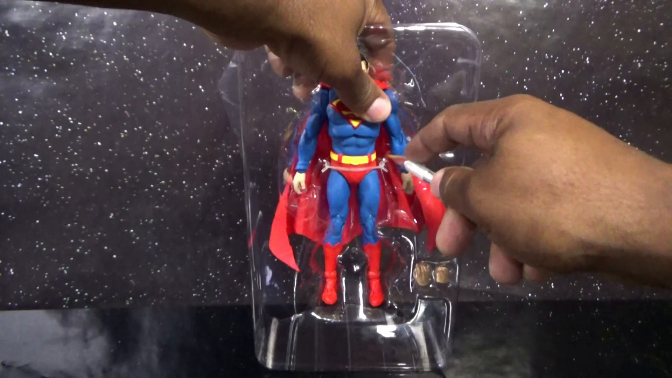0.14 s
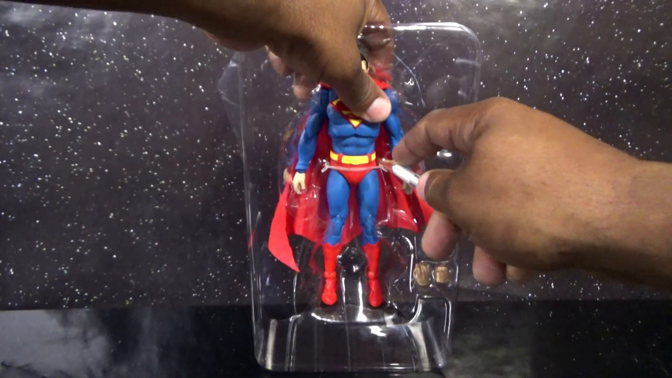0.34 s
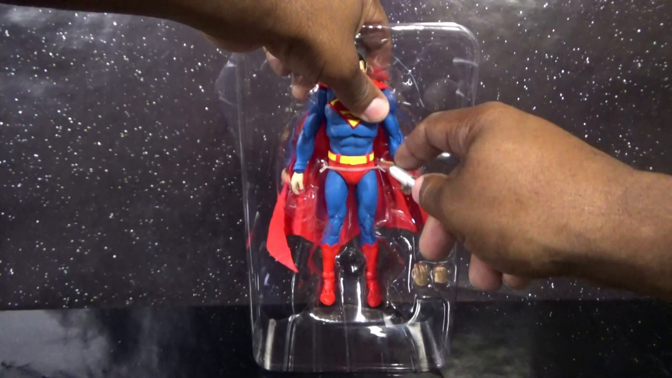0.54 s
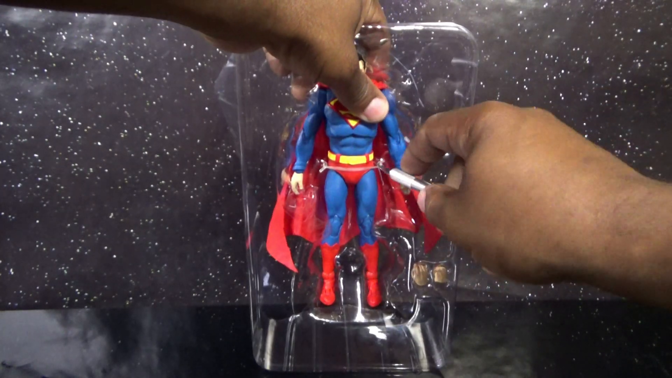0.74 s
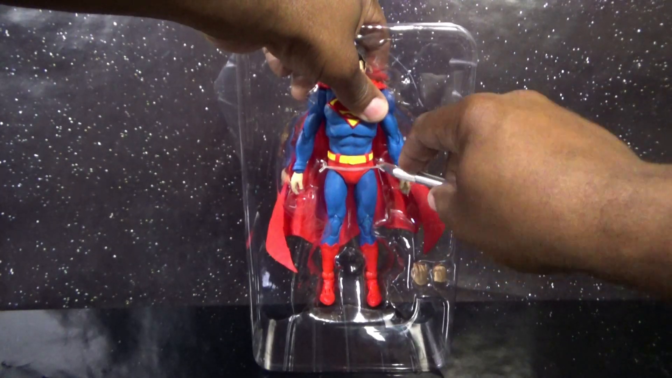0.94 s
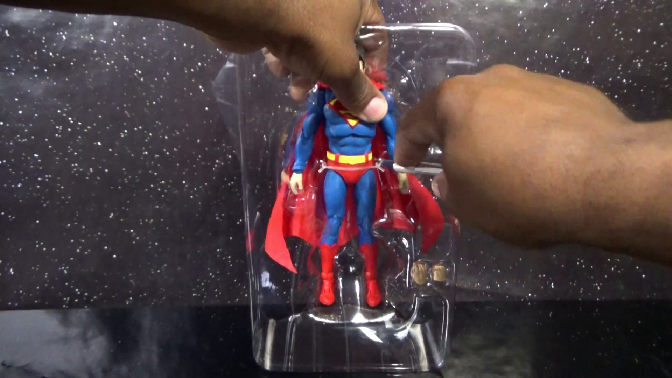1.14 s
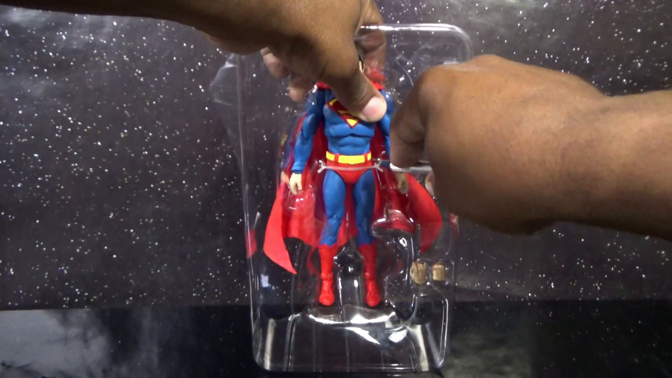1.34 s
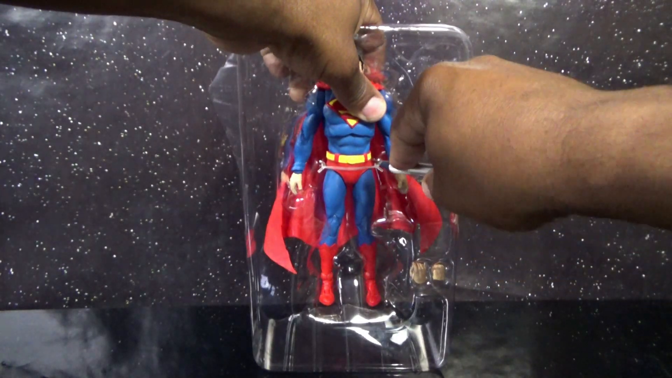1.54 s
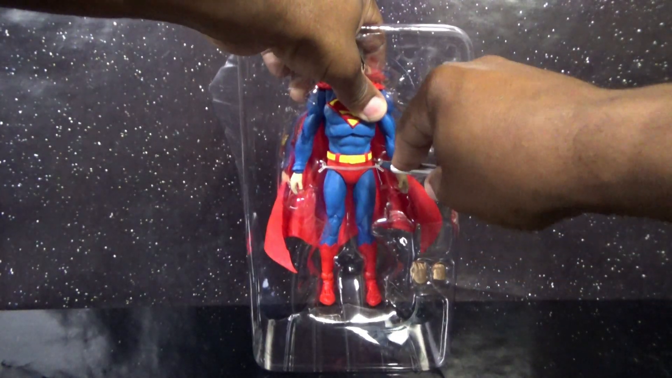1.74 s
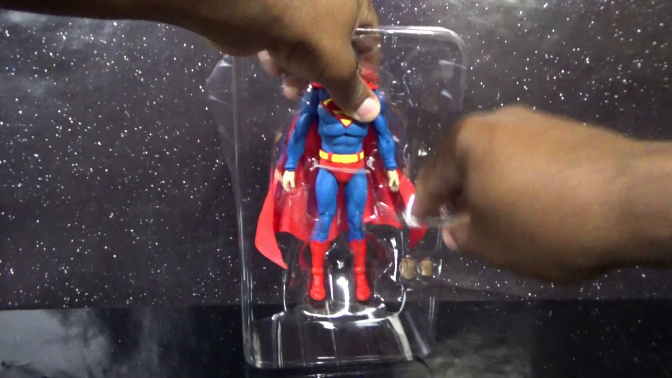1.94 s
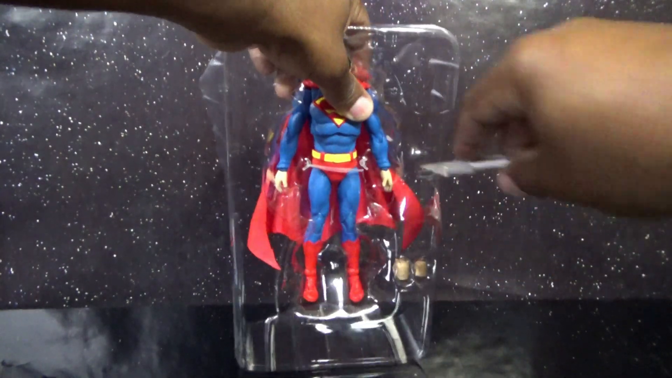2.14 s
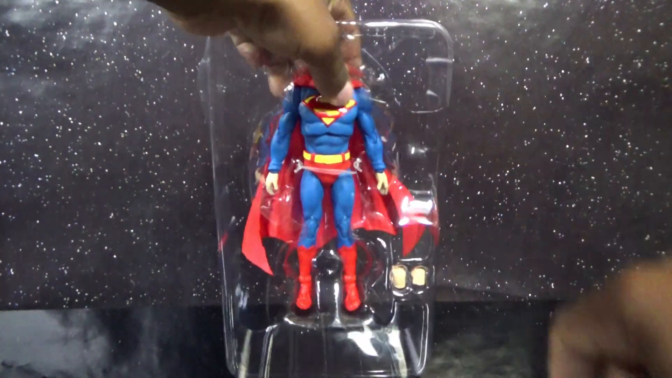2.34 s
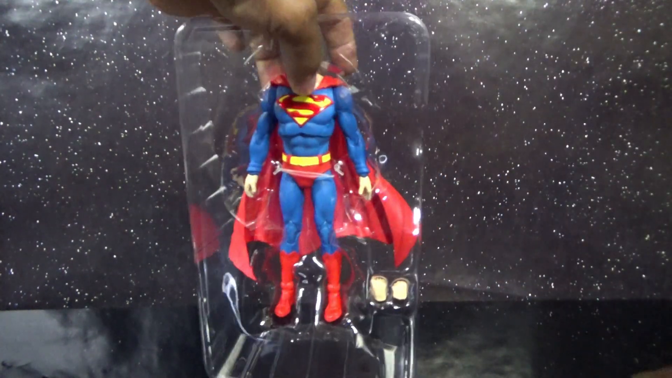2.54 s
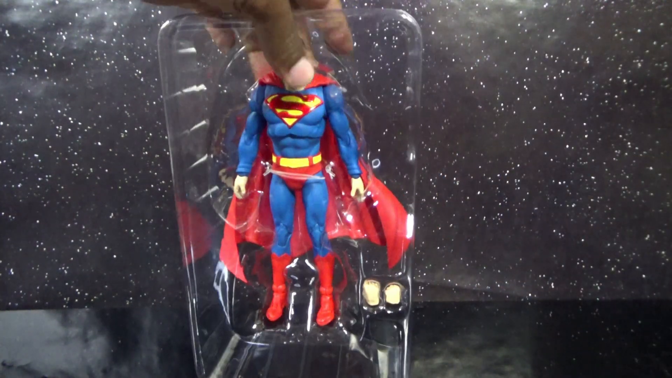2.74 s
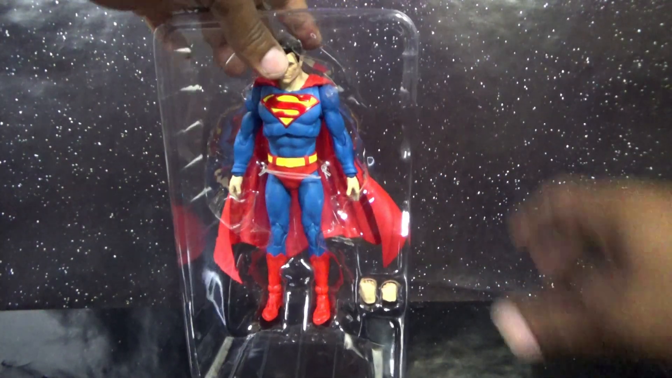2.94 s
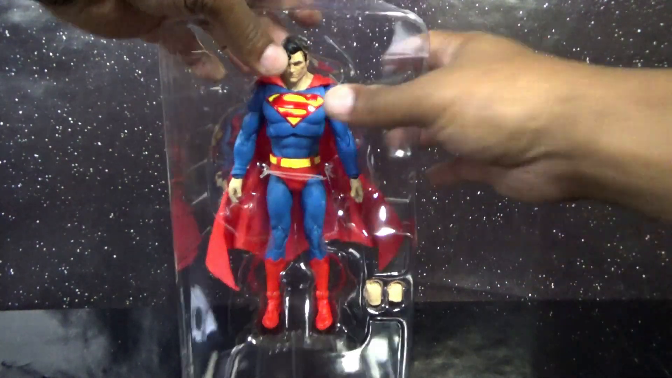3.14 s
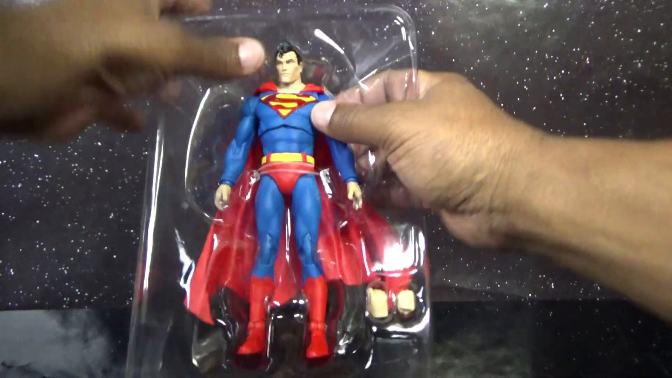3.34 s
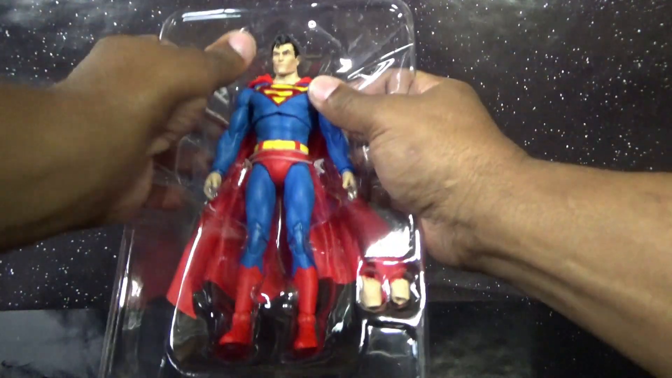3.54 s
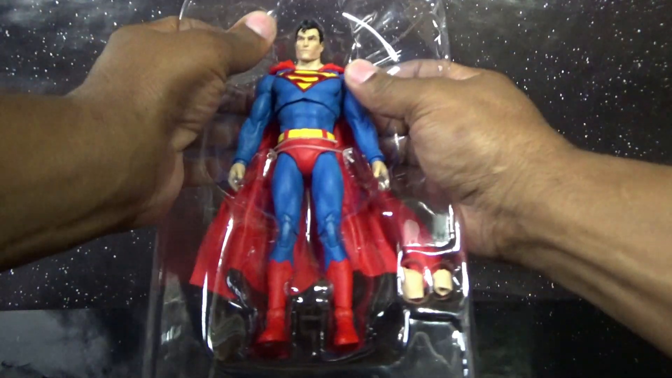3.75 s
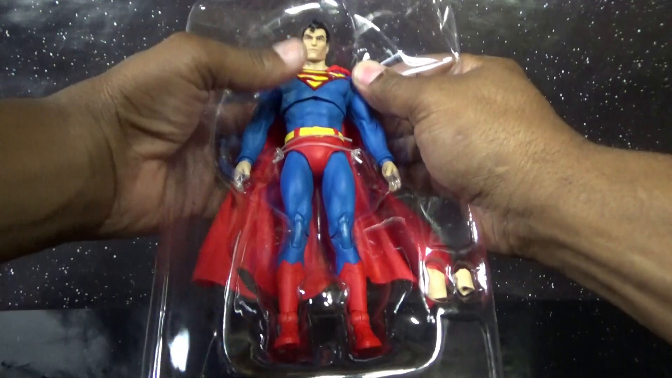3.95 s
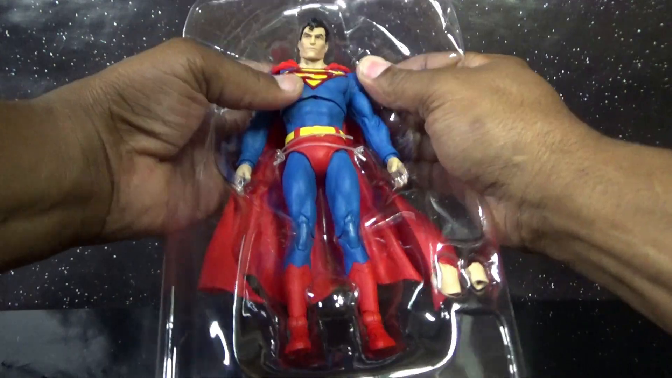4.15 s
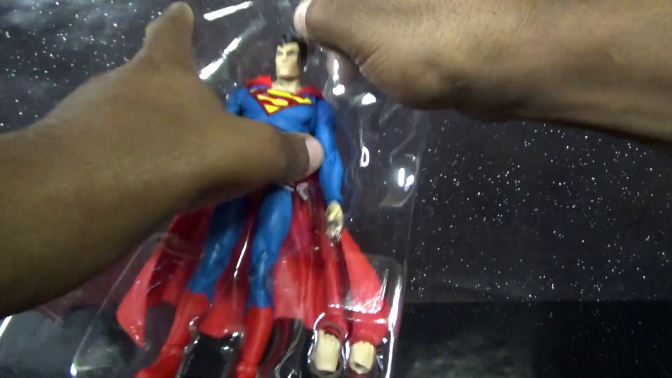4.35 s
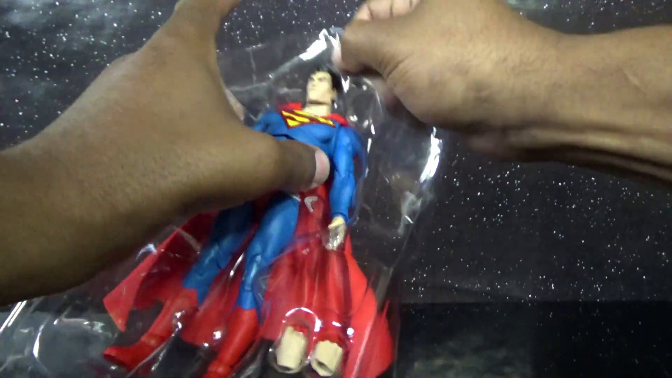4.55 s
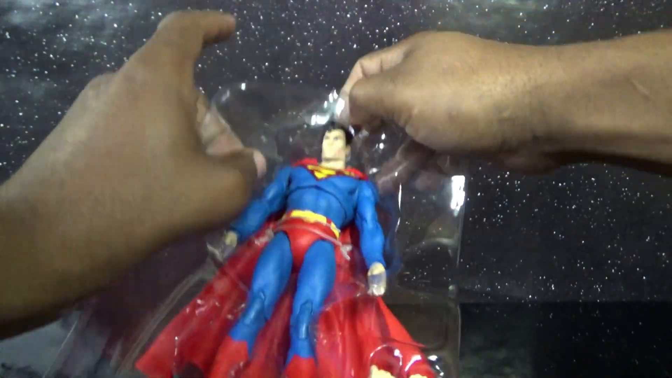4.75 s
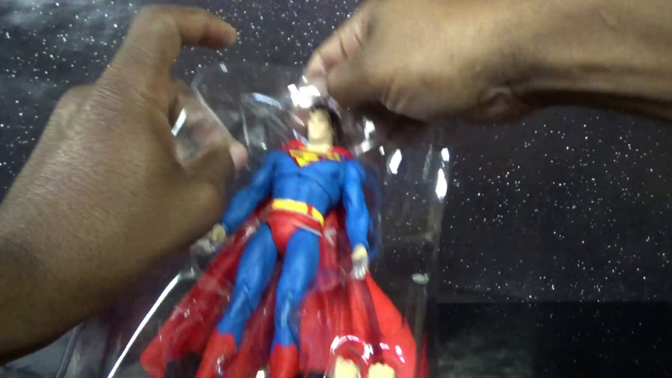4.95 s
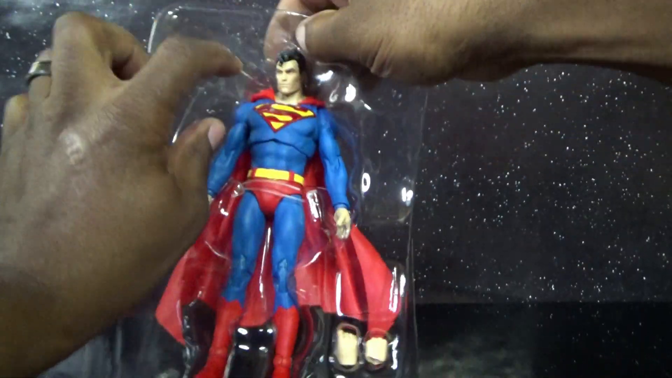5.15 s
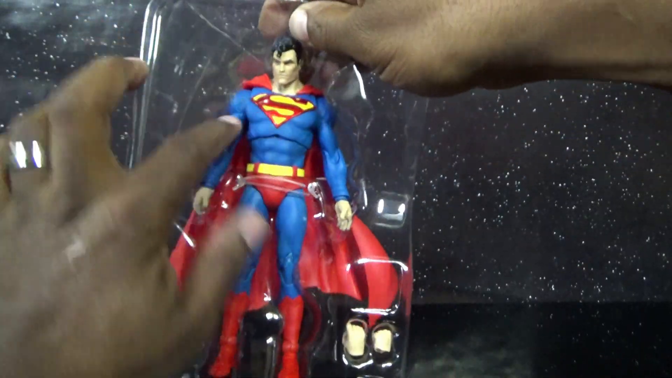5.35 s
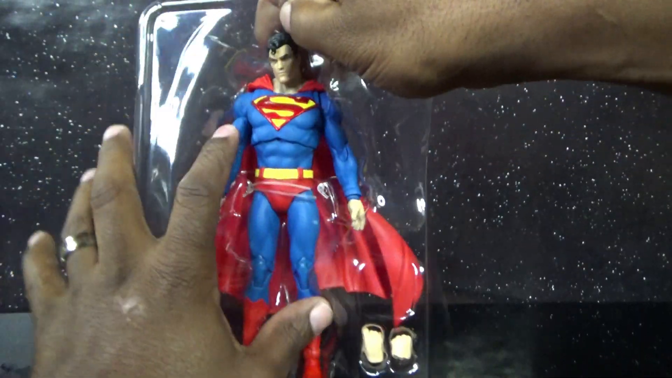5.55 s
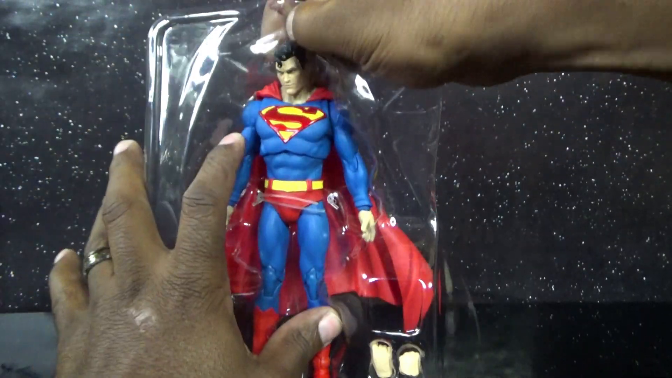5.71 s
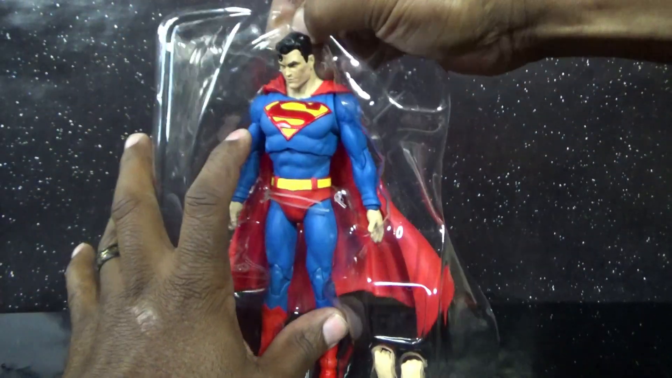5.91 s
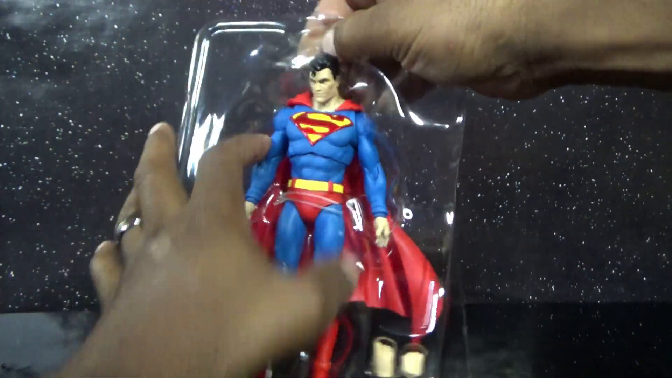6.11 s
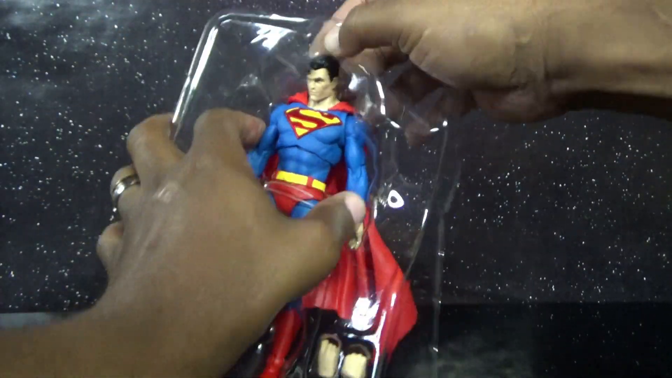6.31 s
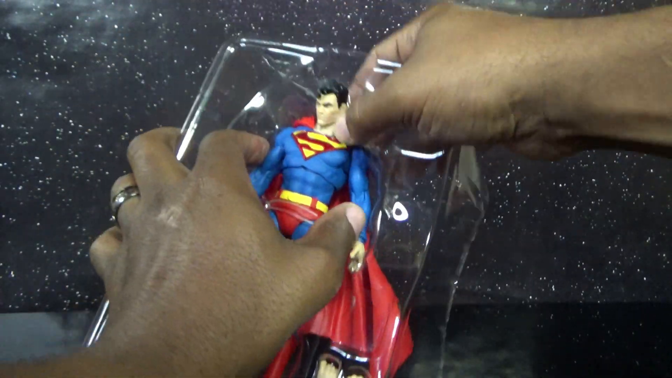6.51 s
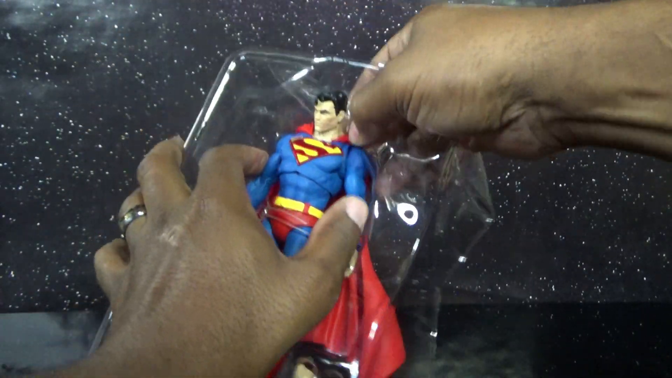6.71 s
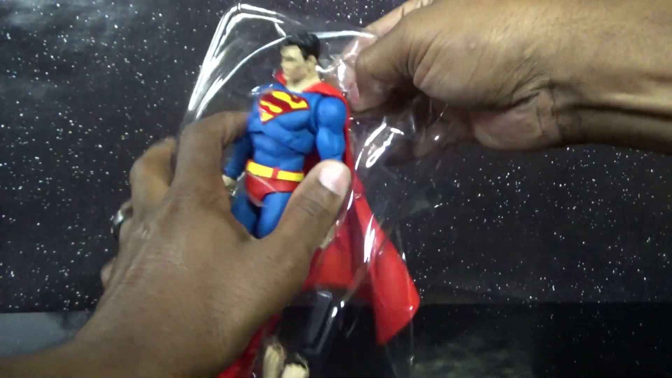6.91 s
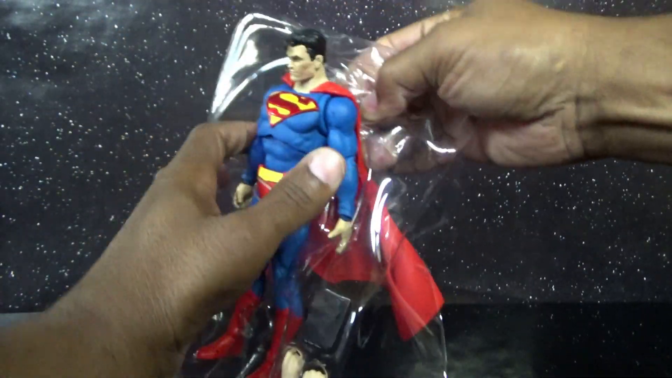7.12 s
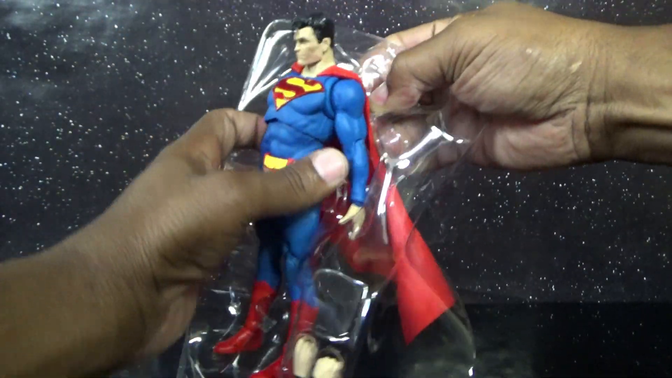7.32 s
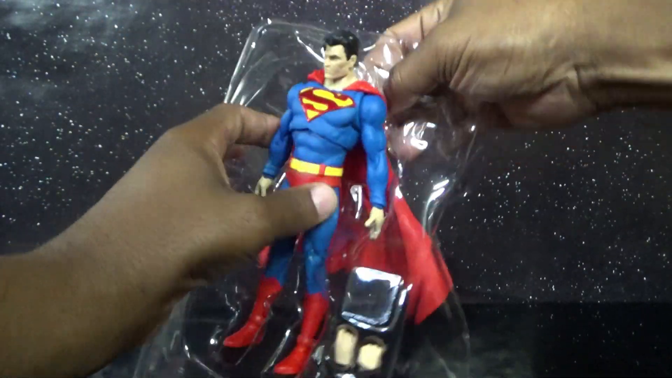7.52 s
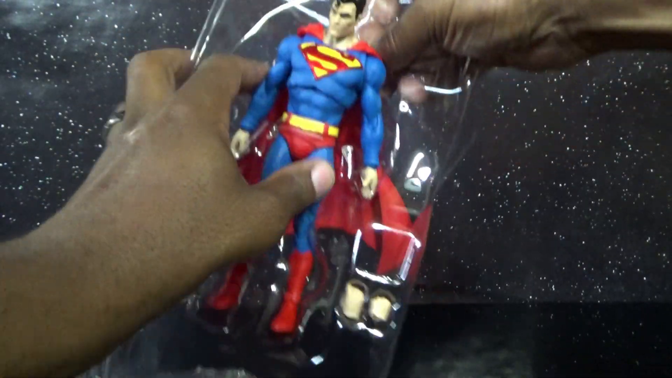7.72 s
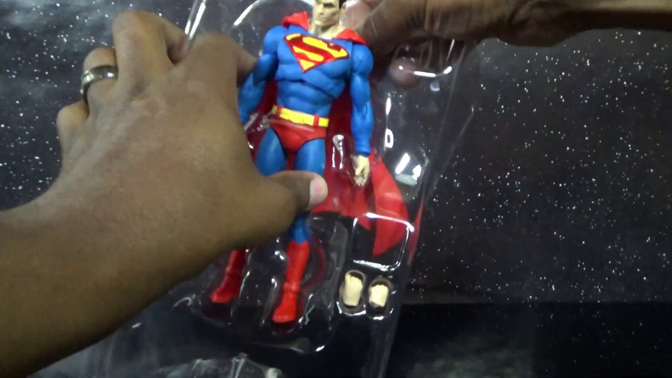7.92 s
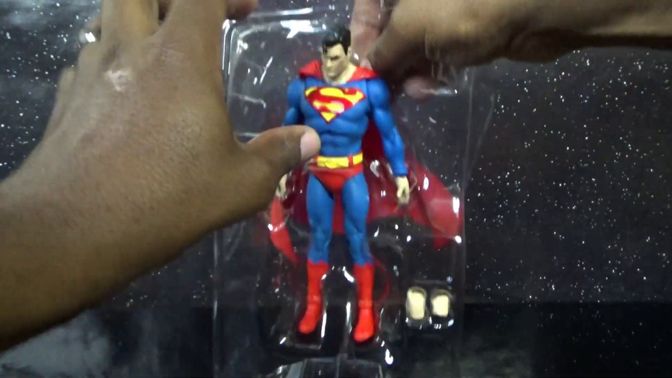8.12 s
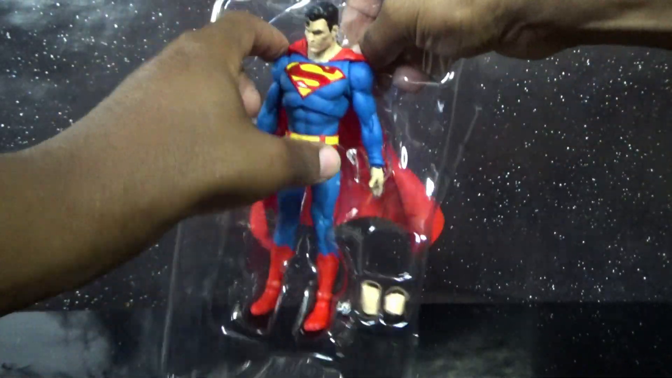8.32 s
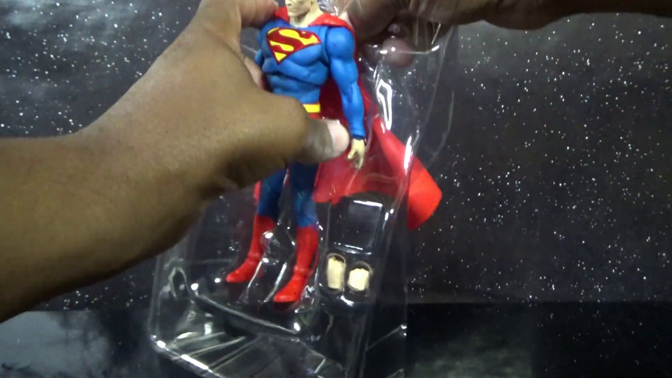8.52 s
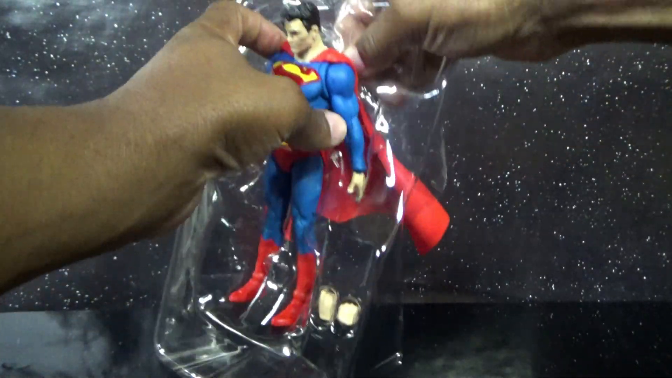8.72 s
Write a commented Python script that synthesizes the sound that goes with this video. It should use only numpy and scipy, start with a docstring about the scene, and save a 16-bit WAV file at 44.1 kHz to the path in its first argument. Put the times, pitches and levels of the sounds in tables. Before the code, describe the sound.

Close, dry crinkling of a thin plastic blister tray: quiet ticking first, a few knocks, then dense snaps, creaks and scrapes until the end.

```python
"""Faint room air and a mains hum lie underneath from start to end, close to the microphone in a small room.
First a knife ticks and sizzles through a tie on a clear plastic blister tray: kicked blade modes, echoed by
the tray's pockets. It is put down amid snaps, clatters and low thumps, dying chatter that rings the thin shell.
Then two hands flex the tray to work a toy figure out: creases buckle in snaps and quick stick-slip runs,
each ringing the bending shell's modes, amid scrapes (dense slips) and creaks (one resonance)."""
import sys
import numpy as np
from scipy import signal
from scipy.fft import rfft, irfft, next_fast_len
from scipy.io import wavfile
from scipy.ndimage import uniform_filter1d, map_coordinates

SR = 44100
rng = np.random.default_rng(int(sys.argv[2]) if len(sys.argv) > 2 else 0)


def persist_wave(psi):
    """Save psi, clipped to +-1, as 16-bit WAV."""
    counts = np.round(np.clip(psi, -1, 1) * 32767).astype(np.int16)
    wavfile.write(sys.argv[1], SR, np.atleast_2d(counts).T)


N = 386757
TIME = np.arange(N) / SR
LEFT_RIGHT = np.array([[1], [-1]])  # a side signal enters the two channels with opposite sign
REFERENCE_S = 0.005  # a buckle at 0 dB holds the energy of a signal at rms 1 for this long
BEND = 0.06  # share by which flexing detunes the modes


def undb(db):
    """Gain of a level in dB."""
    return 10 ** (np.asarray(db) / 20)


def unit(x):
    """The same sound at rms 1."""
    return x / np.sqrt(np.mean(x ** 2))


def walk(rate_hz):
    """Slow chance: random levels joined by lines, spread near 1."""
    levels = rng.standard_normal(4000)
    return 1.2 * np.interp(TIME * rate_hz, np.arange(4000), levels)


def resonance(f, hz, width_hz):
    """Response of one damped mode, gain 1 at its centre."""
    return 1j * f * width_hz / (hz ** 2 - f ** 2 + 1j * f * width_hz)


def bandpass(f, edges_hz):
    """Response of a gentle band-pass, so that neighbouring zones overlap."""
    sos = signal.butter(1, edges_hz, "band", fs=SR, output="sos")
    return signal.sosfreqz(sos, f, fs=SR)[1]


# Colour of the quiet room air: (f/Hz, relative level/dB per Hz)
AIR_COLOUR = [(22, -34), (50, 1), (127, -3), (355, -5.5), (632, -13), (2010, -14), (9970, -27),
              (16000, -24)]


def background(air_db=-67.5, hum_hz=58.7, hum_db=-71.5):
    """Steady room air, as wide coloured noise, and a faint mains hum with its third harmonic."""
    hz, db = np.transpose(AIR_COLOUR)
    size = next_fast_len(N)
    f = np.fft.rfftfreq(size, 1 / SR)
    colour = undb(np.interp(np.log(f + 1), np.log(hz), db))
    noise = rng.standard_normal((2, size))
    mid, side = irfft(rfft(noise) * colour, size)[:, :N]
    air = unit(mid + 0.33 * side * LEFT_RIGHT)
    hum = np.sin(2 * np.pi * hum_hz * TIME)
    hum += 0.5 * np.sin(2 * np.pi * 3 * hum_hz * TIME)
    return undb(air_db) * air + undb(hum_db) * np.sqrt(2) * hum


def room(x, t60_s, wet_db, spread, early=2.08, early_s=0.0026, gap_s=0.0015, dull_hz=11000):
    """Quick reflections off table and backdrop, then a short tail; their pattern shifts as the tray is turned."""
    t = np.arange(SR // 2) / SR
    fade = undb(-60 * t / t60_s) + early * np.exp(-t / early_s)
    fade *= t > gap_s  # silence before the first reflection
    paths = rng.standard_normal((3, len(t))) * fade / np.sqrt(np.sum(fade ** 2))
    paths = signal.sosfilt(signal.butter(2, dull_hz, fs=SR, output="sos"), paths)
    mono = x.mean(axis=0)[None]
    front, back, side = signal.fftconvolve(mono, paths, axes=1)[:, :N]
    turn = 2 * walk(3)
    wet = np.cos(turn) * front + np.sin(turn) * back + spread * side * LEFT_RIGHT
    return x + undb(wet_db) * wet


# The shell's three zones: whole panels, moulded pockets, small creases: (lower edge f/Hz, upper edge f/Hz)
SHELL_ZONES = [(110, 620), (620, 2600), (2600, 17000)]
# Modes of the tray: (f/Hz, width/Hz, relative level/dB)
TRAY_MODES = [(111, 110, -15), (257, 45, -12.5), (336.1, 81, 2), (420.6, 19, -1.5), (765, 47, -2.5),
              (907, 108, 0.5), (1082, 136, 0.5), (1258, 210, -11), (1768, 550, -1.5), (2260, 270, -8.5),
              (3150, 1740, 10), (5380, 4300, 4), (7700, 3100, -3), (9300, 1000, -9)]


def shell(f, zone, modes=TRAY_MODES, detune=1):
    """Response of a body's modes within one zone, detuned as the body bends."""
    lo, hi = SHELL_ZONES[zone]
    ring = sum(undb(db) * resonance(f, hz * detune, width) for hz, width, db in modes if lo < hz < hi)
    return ring * bandpass(f, (lo, hi))


# Pitch of the pocket that is giving way, as the hands move over the tray: (t/s, f/Hz)
POCKET_PITCH_PATH = [(4.0, 1080), (4.4, 1400), (5.25, 1147), (5.55, 1750), (6.8, 1116), (8.6, 1654)]


def buckles(times, gains, decay_s, zone, size, own, modes=TRAY_MODES, tilt_db=0, bend=BEND, kick=2.16,
            lump_db=3.5, give_s=0.00037, own_width=0.15, pocket_range=0.43, pan_db=-0.5):
    """Each buckle is a kick and a dying, lumpy chatter that ring the bent body and the buckling spot.

    own is the gain of the spot's own resonance beside the body, tilt_db is per octave.
    """
    count = len(times)
    t, f = np.arange(size) / SR, np.fft.rfftfreq(size, 1 / SR)
    lo, hi = SHELL_ZONES[zone]

    lumps = np.repeat(rng.standard_normal((count, size // 32)), 32, axis=1)
    push = rng.standard_normal((count, size)) * undb(lump_db * lumps)
    push *= np.exp(-t / np.reshape(decay_s, (-1, 1)))
    push *= 1 - np.exp(-t / give_s)  # the sheet takes an instant to give way
    place, side, flip = 2 * rng.random((count, 3)).T[:, :, None] - 1
    push[:, :1] += kick * np.sign(flip)  # the sheet may flip either way

    if zone == 1:
        pocket_hz = np.interp(times, *np.transpose(POCKET_PITCH_PATH))[:, None]
        spot_hz = pocket_hz * np.exp(pocket_range * place)
    else:
        # share of the way down from the zone's top edge to its bottom edge, on a log scale
        spot_hz = hi * (lo / hi) ** (0.527 + 0.35 * place)
    detune = np.exp(bend * np.interp(times, TIME, walk(10)))[:, None]
    body = shell(f, zone, modes, detune) * undb(tilt_db * np.log2(1 + f / lo))
    spot = 1 + own * resonance(f, spot_hz, own_width * spot_hz)
    rings = irfft(rfft(push) * body * spot)
    energy = np.sum(rings ** 2, axis=1)
    rings *= (gains * np.sqrt(REFERENCE_S * SR / energy))[:, None]

    out = np.zeros((2, N + size))
    starts = np.clip(times * SR, 0, N).astype(int)
    pans = undb(pan_db * side * [1, -1])
    for start, ring, pan in zip(starts, rings, pans):
        out[:, start:start + size] += pan[:, None] * ring
    return out[:, :N]


# Light ticks, mostly of the knife as it saws at the tie: (t/s, relative level/dB)
KNIFE_TICKS = [(0.0946, -29), (0.1264, -36.5), (0.384, -41.5), (1.399, -34.5), (1.495, -30.5),
               (1.5264, -34), (1.551, -29), (1.5778, -28), (1.593, -25), (1.6142, -28), (1.6283, -26),
               (1.6522, -24), (1.691, -24), (1.72, -25.5), (1.8257, -23.5), (1.8407, -20), (2.004, -32),
               (2.0164, -22), (2.0958, -33.5), (2.3223, -30.5), (3.09, -26.5)]
# Modes of the blade: (f/Hz, width/Hz, relative level/dB)
BLADE_MODES = [(3980, 1300, 1), (6660, 2200, 2), (8400, 2900, -5), (12600, 1500, 3.5)]


def knife(blade_db=-12.0, pocket_db=-23):
    """Thin, bright ticks of the blade; each also taps the tray's pockets."""
    times, db = np.transpose(KNIFE_TICKS)
    blade = buckles(times, undb(db + blade_db), decay_s=0.0013, zone=2, size=1024, own=0, modes=BLADE_MODES)
    taps = buckles(times, undb(db + pocket_db), decay_s=0.0026, zone=1, size=1024, own=0.4)
    return blade + taps


# Scrapes, handling rustle and the knife's sizzle, each a rush of tiny slips:
# (start t/s, length t/s, pocket level/dB, crease level/dB)
SCRAPES = [(0.023, .42, -66.5, -82), (1.531, .21, -72, -65), (4.271, .16, -30, -31.5),
           (5.68, .2, -35.5, -28), (5.97, .07, -27, -22.5), (6.261, .06, -32.5, -35),
           (7.409, .07, -33, -27.5), (8.302, .055, -36, -37)]


def scrapes(zone, slip_hz=900, scatter_db=3, slip_s=0.00078):
    """Slips so close together that they merge into a hiss, which swells and fades."""
    times, gains = [], []
    for start, length, *level_db in SCRAPES:
        progress = np.linspace(0, 1, int(length * slip_hz) + 2)
        late, chance = rng.standard_normal((len(progress), 2)).T
        times.append(start + length * progress + late / slip_hz / 2)
        swell = np.sqrt(np.abs(np.sin(np.pi * progress)) / (slip_hz * REFERENCE_S))
        gains.append(undb(level_db[zone - 1] + scatter_db * chance) * swell)
    return buckles(np.concatenate(times), np.concatenate(gains), slip_s, zone, size=512, own=1)


# Creaks and squeaks, where one spot sticks and sings: (t/s, decay t/s, f/Hz, level/dB)
STICKING_SPOTS = [(0.577, 0.0087, 2900, -55), (3.667, 0.065, 1224, -16), (4.552, 0.021, 1150, -12.5),
                  (7.889, 0.034, 6590, -26.5)]


def creaks(width=0.22):
    """A sticking spot chatters into one narrow resonance, its width a share of its pitch."""
    out = 0
    for when, decay_s, hz, db in STICKING_SPOTS:
        zone = 1 + int(hz > SHELL_ZONES[1][1])  # high squeaks sit in the creases
        out = out + buckles(np.array([when]), undb([db]), decay_s, zone, size=4096, own=0,
                            modes=[(hz, width * hz, 0)], bend=0)
    return out


# Resting grip on the tray between squeezes: (t/s, force level/dB)
RESTING_GRIP = [(0, -57), (1.2, -86), (2.6, -57), (3.05, -59), (3.35, -47), (5.2, -39), (6.25, -41),
                (6.41, -54), (6.6, -38), (7.4, -37), (8.05, -51), (8.77, -48)]
# Squeezes and shifts of the hands:
# (start t/s, length t/s, force level/dB, sharpness = creases over pockets level/dB)
HAND_SQUEEZES = [(0.0, 0.029, -46.5, -13), (1.995, 0.39, -55, -7), (2.292, 0.15, -55.5, 4),
                 (3.101, 0.12, -40.5, -2.5), (3.77, 0.12, -29, -2), (3.941, 0.21, -33, 3),
                 (4.24, 0.28, -26, 1), (4.448, 0.29, -24.5, -4), (4.851, 0.23, -33, 6),
                 (5.143, 0.15, -34.5, -2), (5.424, 0.3, -26, -1), (5.69, 0.23, -30, 6.5),
                 (6.01, 0.074, -30, 5), (6.085, 0.099, -33, 2.5), (6.246, 0.11, -30.5, -2),
                 (6.45, 0.08, -33, -1.5), (6.59, 0.41, -29, 2.5), (7.052, 0.13, -33, 8),
                 (7.136, .15, -26.5, 0), (7.405, .11, -25, -0.5), (7.573, 0.062, -34.5, -10),
                 (7.68, 0.063, -37, 5.5), (7.747, 0.27, -40, 0), (8.078, .18, -41, -2),
                 (8.286, 0.45, -35.5, 7), (8.555, 0.11, -27, -1.5)]


def flex(zone, attack_s=0.02, release_s=0.025, sharpen_db_per_s=9.5, panel_db=-19.5, panel_growth=0.69):
    """How hard the hands work a zone: a resting grip plus squeezes that build up, hold, sharpen and let go."""
    power = undb(np.interp(TIME, *np.transpose(RESTING_GRIP))) ** 2
    for start, length, force_db, sharp_db in HAND_SQUEEZES:
        age = TIME - start
        shape = np.clip(age / attack_s, 0, 1) * np.exp(-np.maximum(age - length, 0) / release_s)
        # pockets give first, then the load moves into the creases
        shift_db = sharpen_db_per_s * (np.clip(age, 0, length) - length / 2) / 2
        zone_db = sharp_db + shift_db if zone == 2 else -shift_db
        power = power + (shape * undb(force_db + zone_db)) ** 2
    force = np.sqrt(power)
    if zone == 0:
        # large panels move even under a light touch: they grow by less than a dB per dB of force
        return undb(panel_db) * force ** panel_growth
    return force


def slips(rate_hz=130, wander=0.5, jitter=0.4, firm_db=-30, pace_growth=0.45, idle_hz=25):
    """Times of stick-slip releases: nearly even runs, sparse under a light touch, dense in a hard squeeze."""
    pace = idle_hz + rate_hz * (flex(2) / undb(firm_db)) ** pace_growth
    travel = np.cumsum(pace * np.exp(wander * walk(14))) / SR
    marks = np.cumsum(np.exp(jitter * rng.standard_normal(size=6000)))
    return np.interp(marks[marks < travel[-1]], travel, TIME)


def crinkle(times, force_db, effort, zone, decay_s, scatter_db, own, tilt_db, yield_db=-53):
    """A run of small buckles that release the energy the hands put in; a light touch buckles little."""
    gains = undb(force_db + scatter_db * (2 * rng.random(len(times)) - 1))
    index = np.minimum((times * SR).astype(int), N - 1)
    # dividing by the local power keeps dense runs from outgrowing the effort
    power = uniform_filter1d(np.bincount(index, gains ** 2, N), size=3000) * REFERENCE_S * SR
    released = effort ** 2 / (effort + undb(yield_db))
    gains = gains * released[index] / np.sqrt(power[index])
    return buckles(times, gains, decay_s, zone, size=1024, own=own, tilt_db=tilt_db)


def rub(effort, zone, flutter_db=4.5):
    """Figure and fingers slide over the shell with an uneven hiss whose colour drifts as it bends."""
    size = next_fast_len(N)
    noise = rng.standard_normal(size)
    hiss = irfft(rfft(noise) * shell(np.fft.rfftfreq(size, 1 / SR), zone), size)
    drift = np.cumsum(np.exp(BEND * walk(10)))  # varying playback speed shifts the modes
    bent = map_coordinates(hiss, [drift], order=3, mode="wrap")
    return effort * unit(bent * undb(flutter_db * walk(45)))


# Single snaps of the plastic:
# (t/s, relative pocket level/dB, panel level/dB over the pockets, crease level/dB over the pockets)
PLASTIC_SNAPS = [(0.009, -19, -22, -6.5), (0.436, -49, -3, -22), (0.75, -35, -23, -10),
                 (0.895, -47.5, -10, -16), (1.034, -47, -23, -11), (1.239, -34, -15, -4.5),
                 (1.293, -23, -26, -4), (1.474, -33.5, -21, -24), (1.605, -28.5, -11, -17),
                 (1.814, -30, -17, -24), (1.867, -7.5, -16, -12), (1.873, -12, -32, -1),
                 (1.941, -15.5, -14, -13), (1.952, -14, -23, -0.5), (2.486, -26, -13, 1),
                 (3.163, -9, -21, -17.5), (3.264, -12.5, -26, -3), (3.414, -28.5, -21, 6),
                 (3.499, -37, -14, 11), (3.529, -25, -14.5, 0), (3.606, -13, -23.5, -21),
                 (3.665, -7.5, -33, -14), (3.726, -17, -12.5, 2.5), (3.78, -9.5, -30, -9),
                 (3.825, -17, -15, -21), (3.842, -8, -17.5, -7.5), (3.898, -11.5, -29, -19),
                 (4.072, -12, -28, -8), (4.091, -9.5, -25, -6), (4.14, -9.5, -23, -6),
                 (4.176, -17, -15, -1.5), (4.195, -8, -15.5, -12), (4.216, -8.5, -22.5, -6.5),
                 (4.246, -11.5, -34, -4.5), (4.479, -8, -12.5, -16), (4.54, -11, -24, -7),
                 (4.585, -9, -23, -10), (4.623, -14, -11.5, -6), (4.748, -4, -15.5, -14),
                 (4.829, -8, -25, -11.5), (4.876, -11, -22, -5), (5.031, -14, -34, -3),
                 (5.168, -20.5, -17, 7.5), (5.251, -7.5, -19.5, -5.5), (5.319, -22, -18, -10),
                 (5.399, -14.5, -13, -3), (5.618, -17, -28, -1), (5.678, -8.5, -24, -8),
                 (5.947, -23, -8, 6.5), (6.107, -14, -17, -8), (6.153, -22, -14, 2), (6.167, -20, -12, -6),
                 (6.308, -11.5, -19, -7), (6.423, -12.5, -24, -9), (6.51, -13, -26, 0),
                 (6.591, -9.5, -22, -5.5), (6.648, -16.5, -10, -27), (6.674, -16, -25, -17),
                 (6.831, -6, -16, -9.5), (6.873, -6.5, -22, -12), (6.922, -5.5, -28, -8.5),
                 (6.969, -8.5, -25, -25), (7.052, -12.5, -29, -13), (7.285, -8.5, -25, -14),
                 (7.372, -15.5, -16.5, -1), (7.451, -9.5, -18, -11), (7.467, -4.5, -21, -14),
                 (7.501, -5.5, -27, -26), (7.527, -10, -23, -28), (7.605, -17, -7, -5.5),
                 (7.643, -7.5, -11.5, -8.5), (7.657, -6, -33, -11), (7.747, -20.5, -25, 4.5),
                 (7.923, -13, -19.5, -14.5), (7.973, -8.5, -14, -9), (8.077, -17, -16, -9),
                 (8.206, -20, -14, -4.5), (8.247, -12.5, -13, -7.5), (8.329, -9.5, -27, -9),
                 (8.428, -19, -32, 4), (8.559, -11, -37, -2.5), (8.628, -11, -24, -8),
                 (8.706, -10, -18.5, -12), (8.744, -11, -28, -4.5)]
# Knocks, clatters and low thumps with a longer decay:
# (t/s, decay t/s, panel level/dB, pocket level/dB, crease level/dB)
LONG_KNOCKS = [(1.878, 0.041, -24.5, -29, -23), (1.955, 0.019, -29.5, -59, -51),
               (2.487, 0.049, -40.5, -38, -37.5), (2.757, 0.032, -34.5, -32, -12.5),
               (2.779, 0.02, -43, -29, -14), (2.982, 0.014, -29.5, -35, -50),
               (3.209, 0.028, -20, -46, -31.5), (3.265, 0.032, -27, -20.5, -19)]


def tray(zone, times, force_db, snap_s, slip_s, scatter_db, snap_db, crinkle_db, rub_db, own=2, tilt_db=0):
    """Everything one zone of the shell radiates: snaps, long knocks, crinkling and rubbing."""
    when, pocket_db, panel_db, crease_db = np.transpose(PLASTIC_SNAPS)
    knocks = np.array(LONG_KNOCKS)
    effort = flex(zone)
    snap_gains = undb(snap_db + pocket_db + (panel_db, 0, crease_db)[zone])
    out = buckles(when, snap_gains, snap_s, zone, size=2048, own=1.0)
    out += buckles(knocks[:, 0], undb(knocks[:, 2 + zone]), knocks[:, 1], zone, size=8192, own=0)
    out += undb(crinkle_db) * crinkle(times, force_db, effort, zone, slip_s, scatter_db, own, tilt_db)
    return out + undb(rub_db) * rub(effort, zone)


def scene():
    """Every slip ticks a crease, about half also pop a pocket; panels move longest, creases are sharpest."""
    times = slips()
    force_db = 5.0 * (2 * rng.random(len(times)) - 1)  # a crease holds only so much before it gives
    pops = rng.random(len(times)) < 0.5
    panels = tray(0, times, force_db, snap_s=0.0061, slip_s=0.0056, scatter_db=14.5,
                  snap_db=2.5, crinkle_db=2, rub_db=-1.5)
    pockets = tray(1, times[pops], force_db[pops], snap_s=0.0027, slip_s=0.0011, scatter_db=7.5,
                   snap_db=-9.0, crinkle_db=1.0, rub_db=-11, own=1.95)
    creases = tray(2, times, force_db, snap_s=0.0018, slip_s=0.00062, scatter_db=6.0,
                   snap_db=-3.5, crinkle_db=0.0, rub_db=-8.5, own=1, tilt_db=1.5)
    low = room(panels, t60_s=0.26, wet_db=-8.5, spread=0.15)
    mid = room(pockets + scrapes(1) + creaks(), t60_s=0.25, wet_db=-5.0, spread=0.32)
    high = room(creases + scrapes(2) + knife(), t60_s=0.15, wet_db=-5.5, spread=0.5)
    return background() + low + mid + high


def record(dry, treble_hz=13200, ceiling=0.7, top_hz=16000):
    """The microphone dulls the highest treble; the recorder rounds the tallest peaks and cuts off the top."""
    soft = signal.sosfilt(signal.butter(3, treble_hz, fs=SR, output="sos"), dry)
    rounded = ceiling * np.tanh(soft / ceiling)
    return signal.sosfilt(signal.ellip(10, 0.2, 70, top_hz, fs=SR, output="sos"), rounded)


dry = scene()
out = record(dry)
persist_wave(out)
```